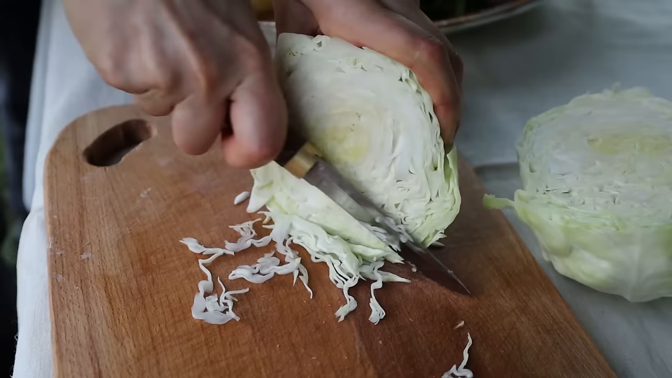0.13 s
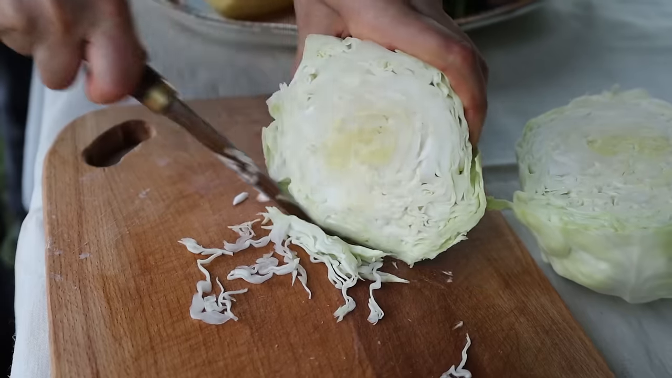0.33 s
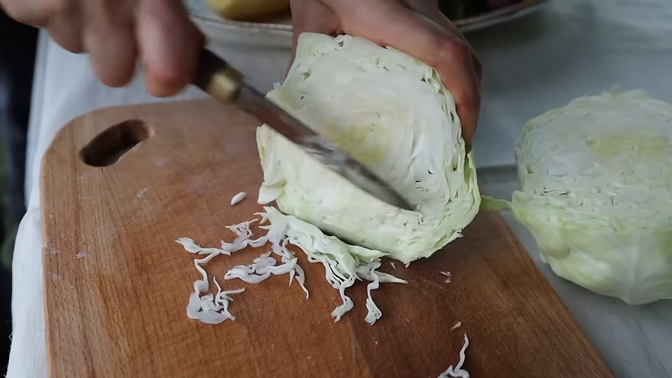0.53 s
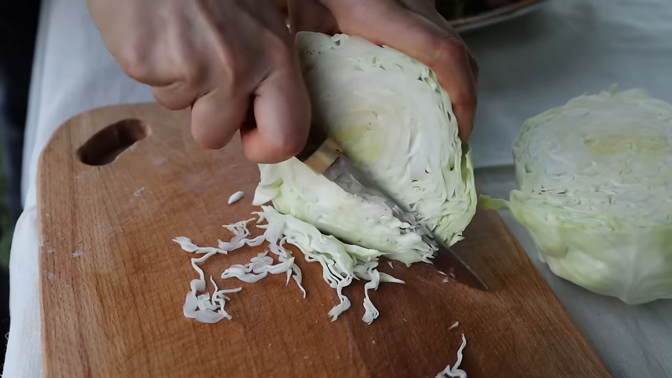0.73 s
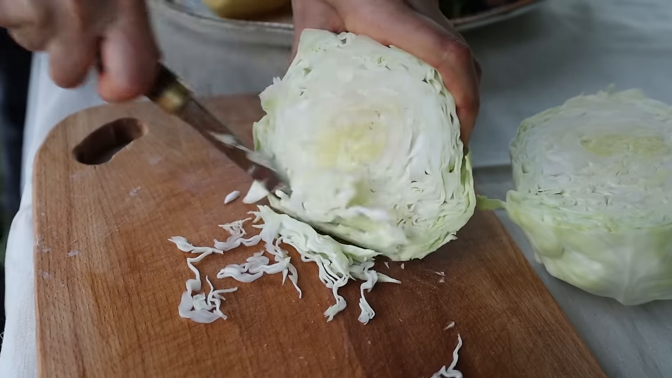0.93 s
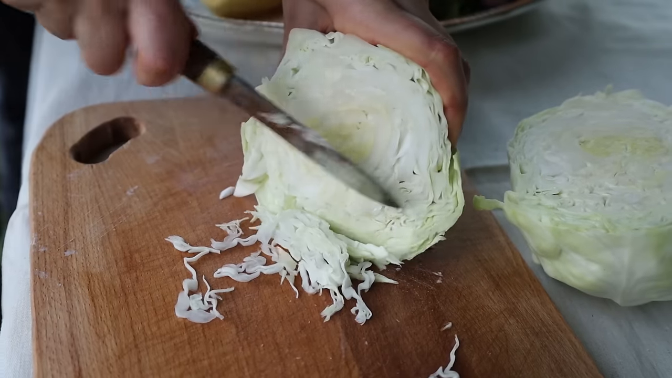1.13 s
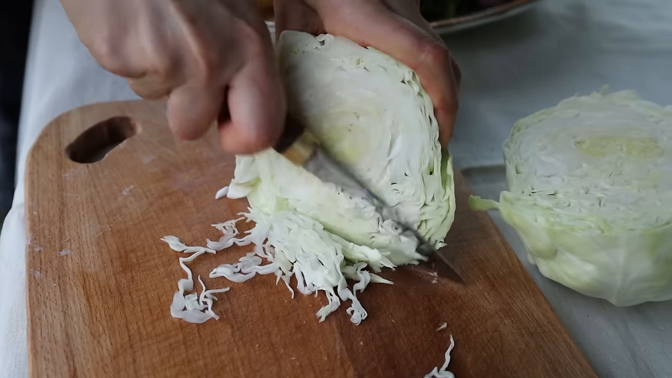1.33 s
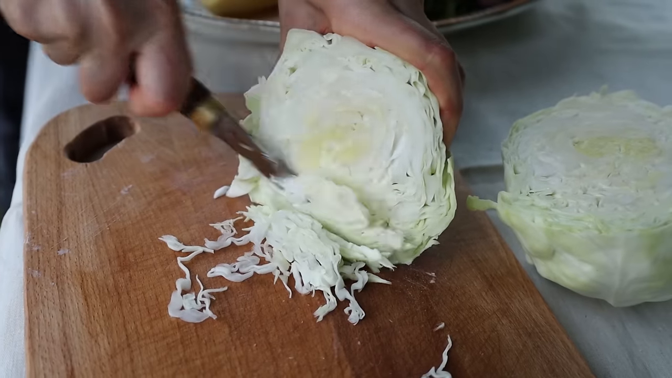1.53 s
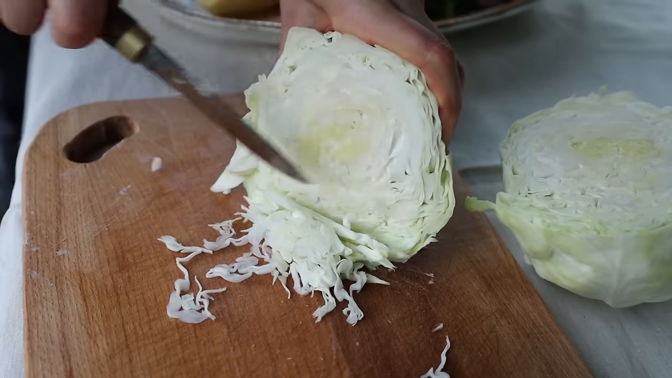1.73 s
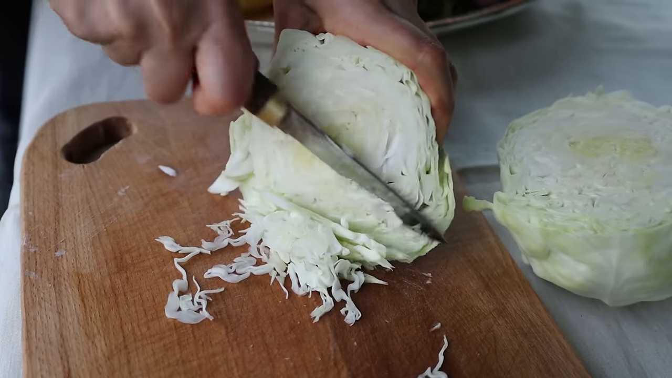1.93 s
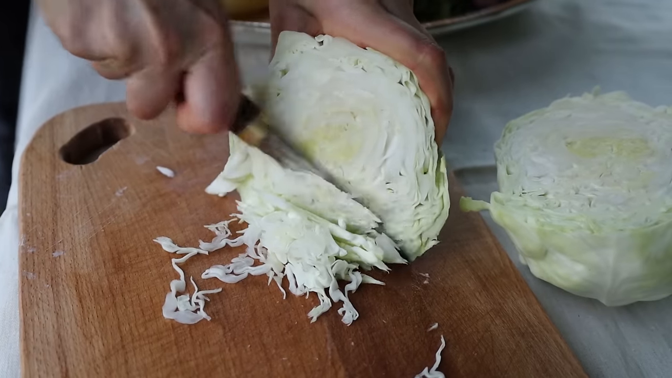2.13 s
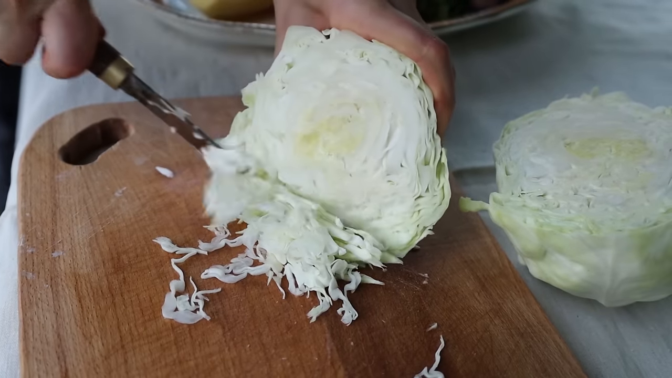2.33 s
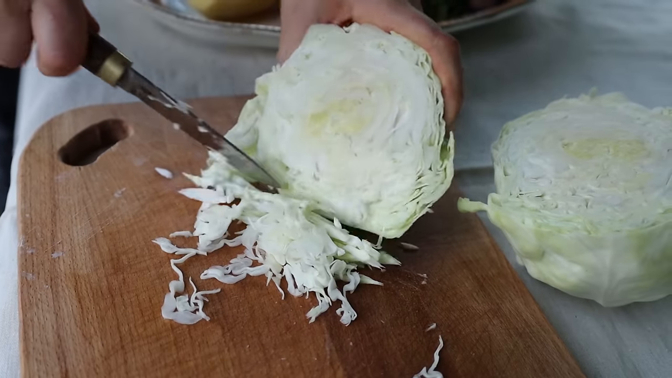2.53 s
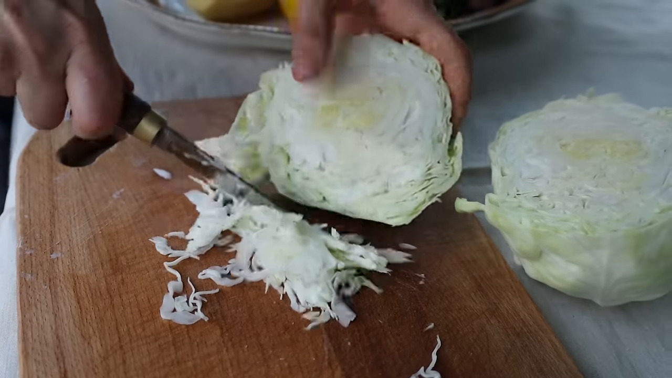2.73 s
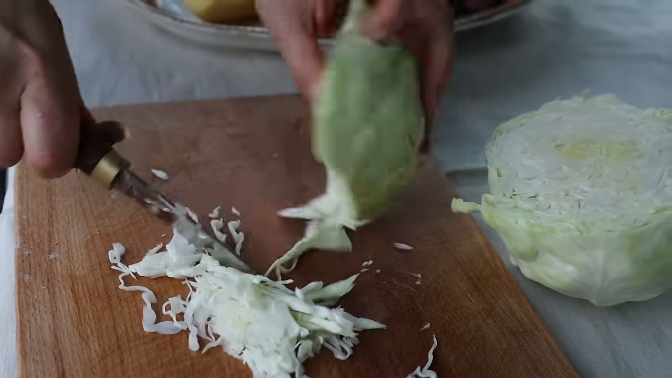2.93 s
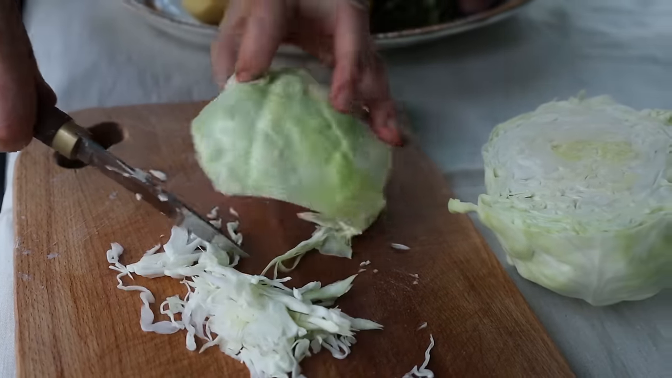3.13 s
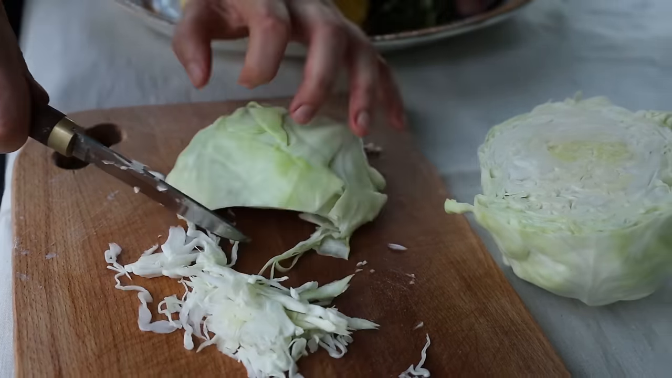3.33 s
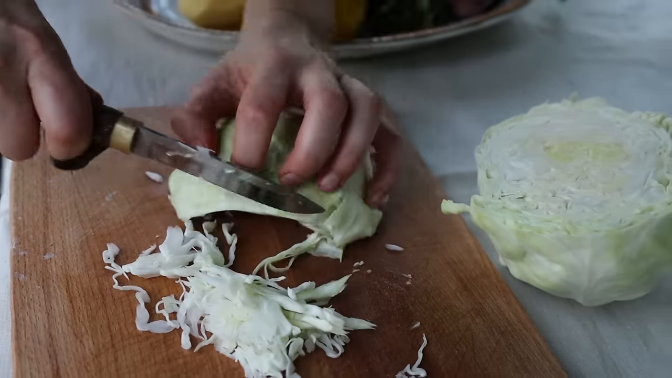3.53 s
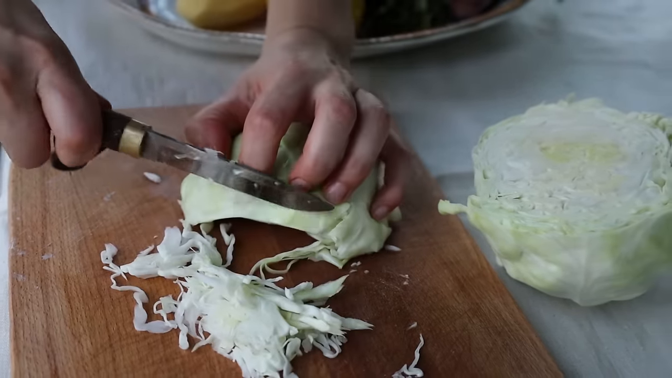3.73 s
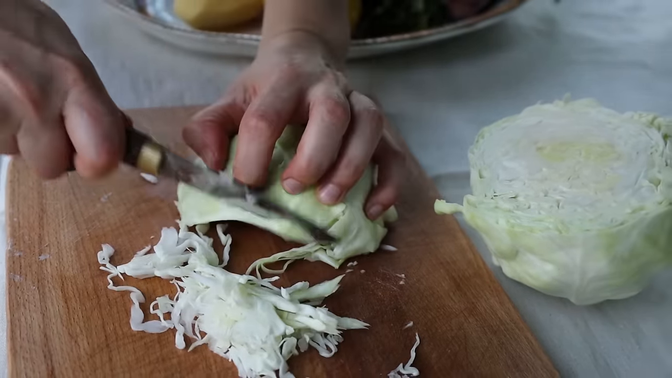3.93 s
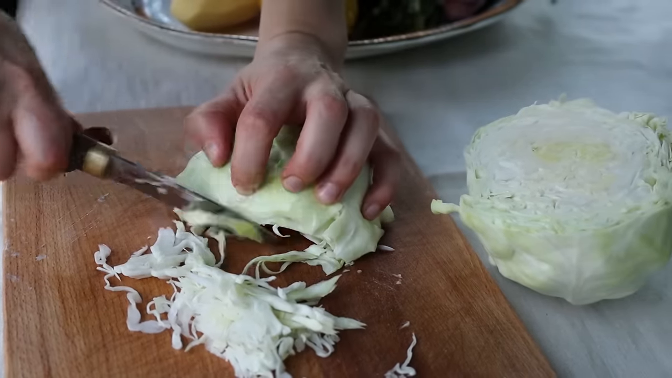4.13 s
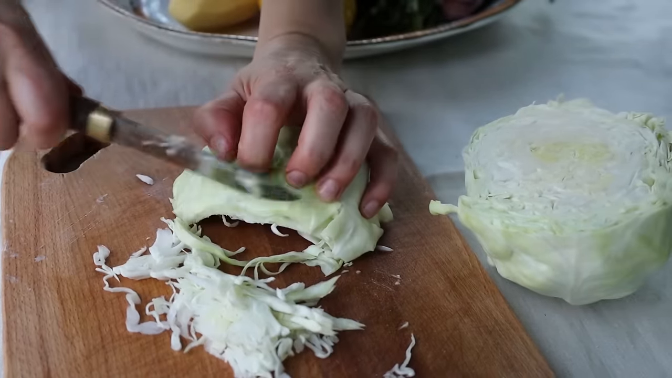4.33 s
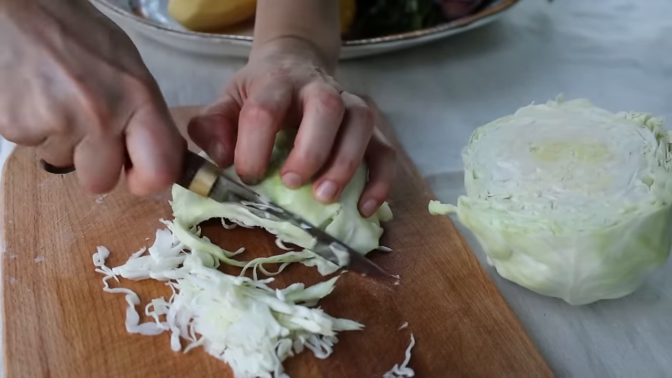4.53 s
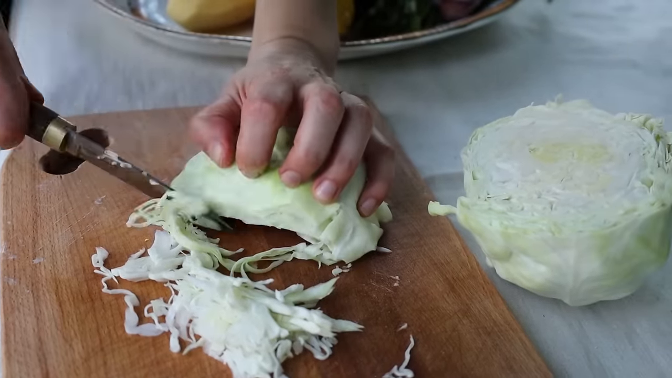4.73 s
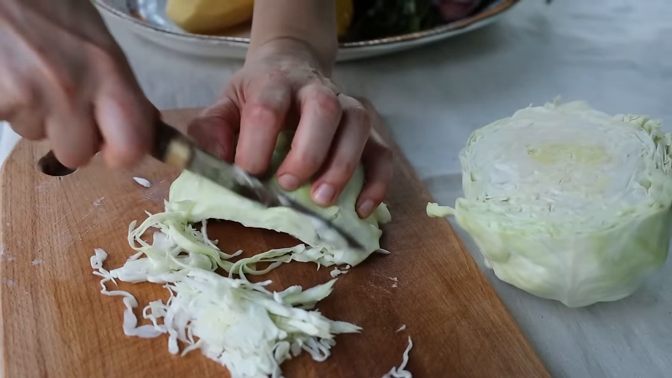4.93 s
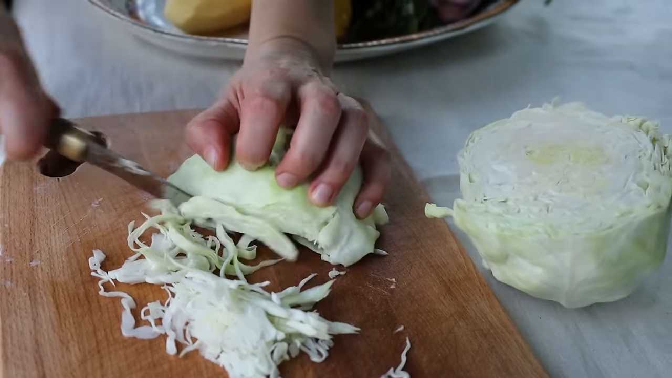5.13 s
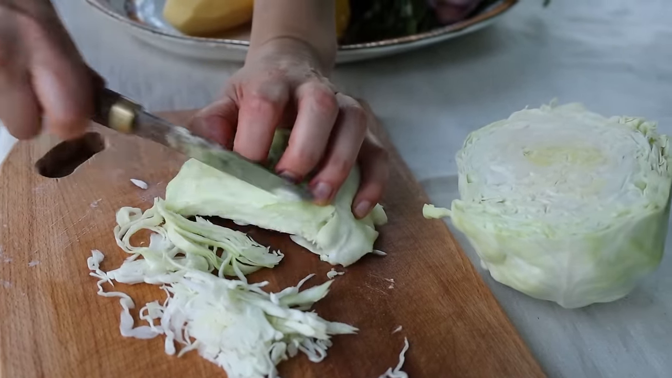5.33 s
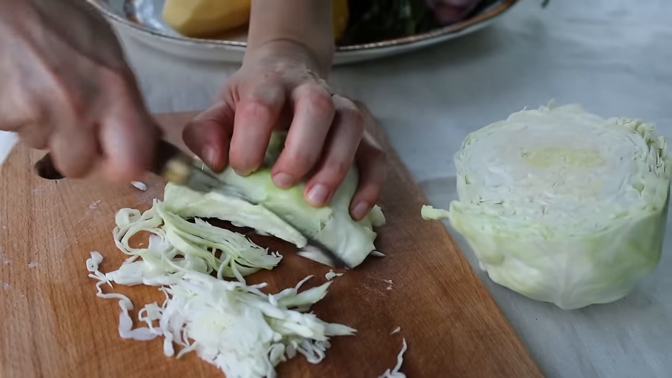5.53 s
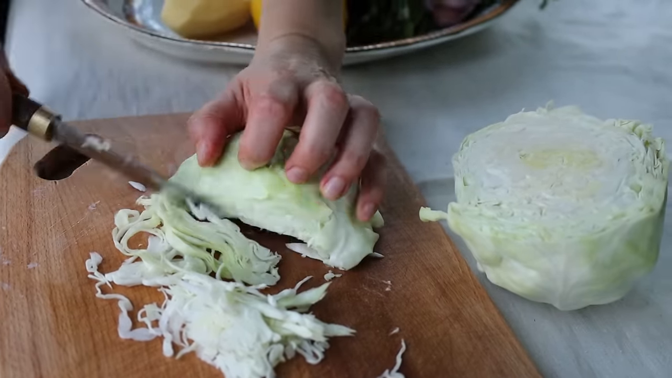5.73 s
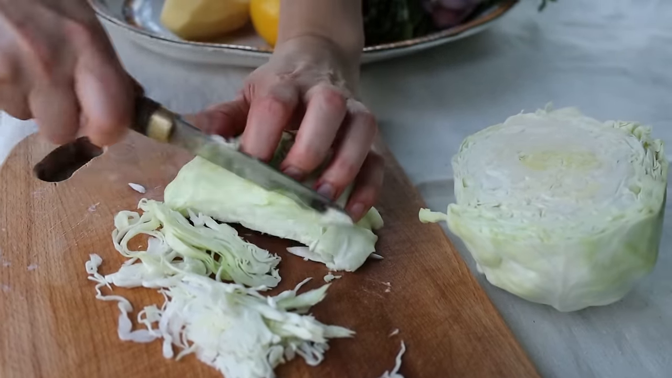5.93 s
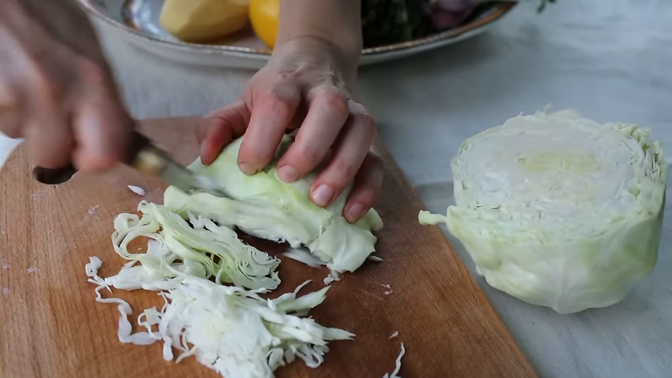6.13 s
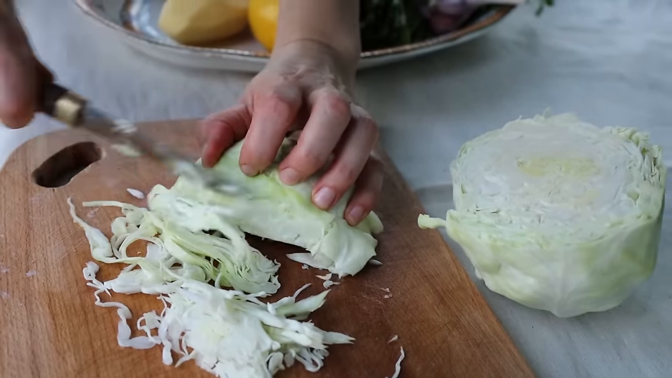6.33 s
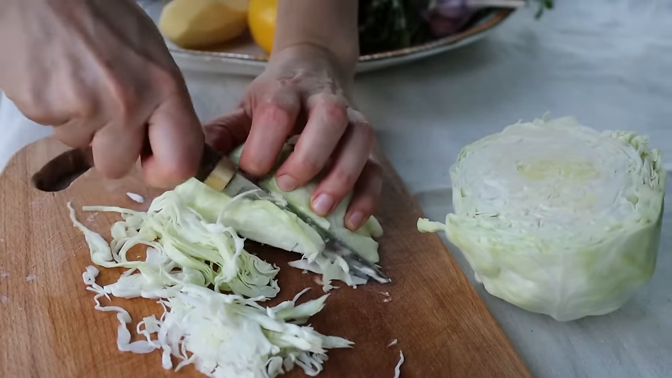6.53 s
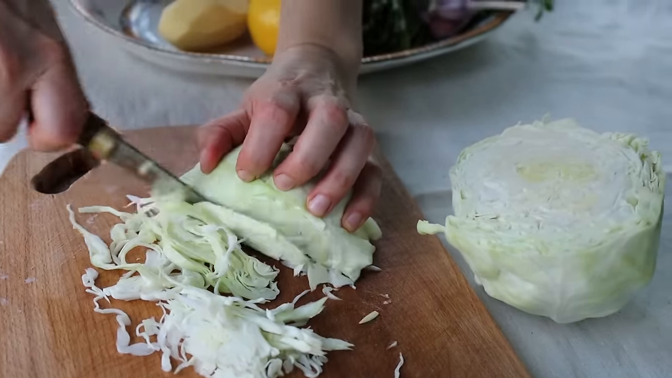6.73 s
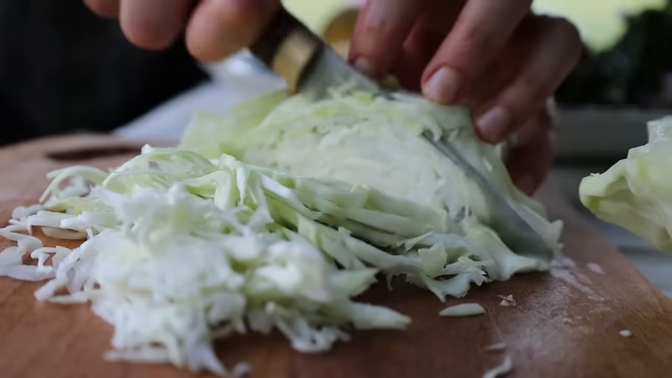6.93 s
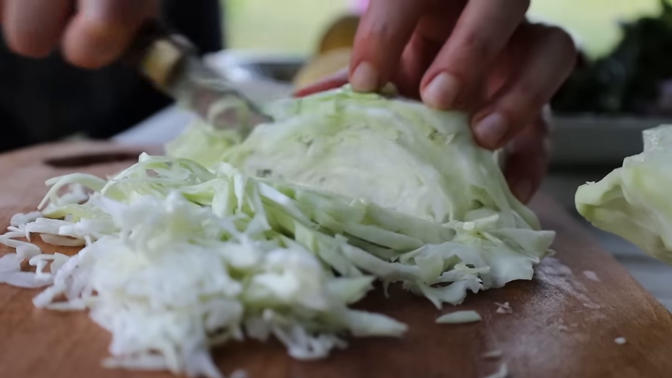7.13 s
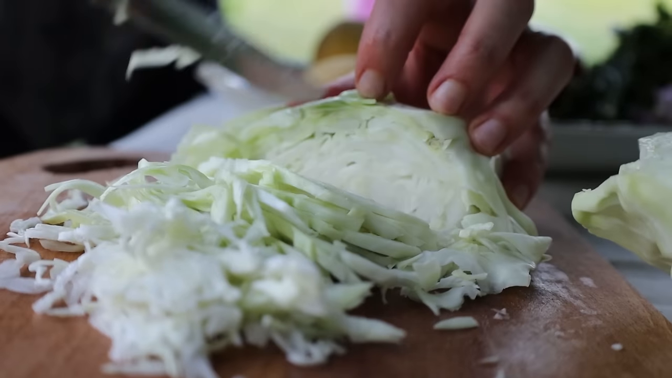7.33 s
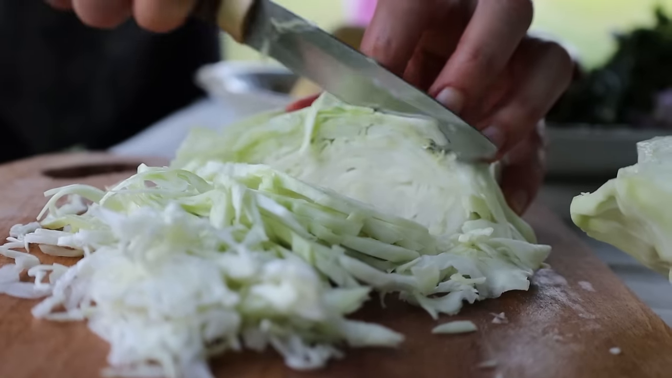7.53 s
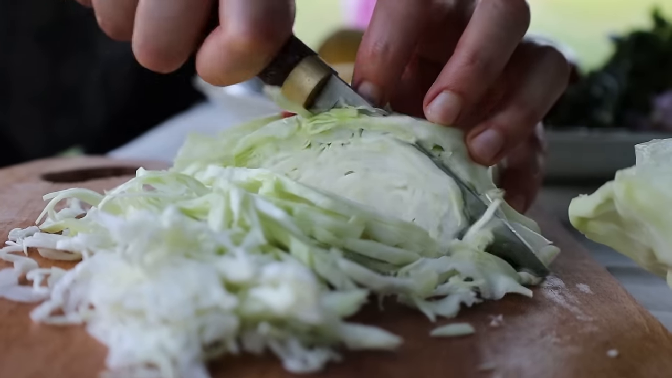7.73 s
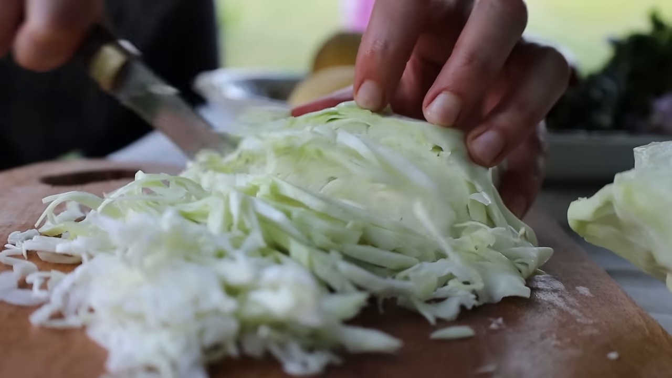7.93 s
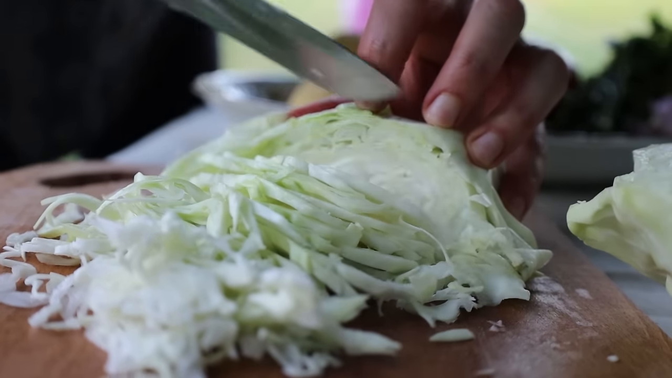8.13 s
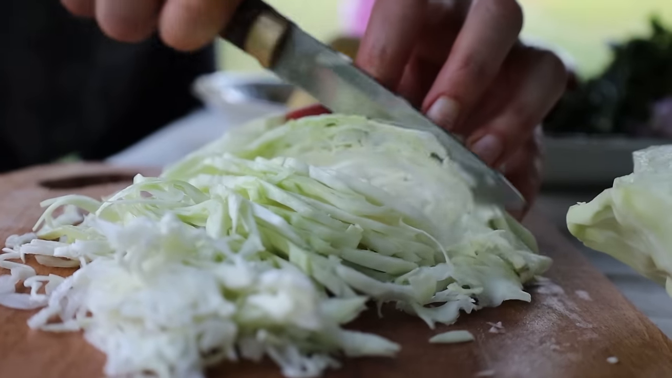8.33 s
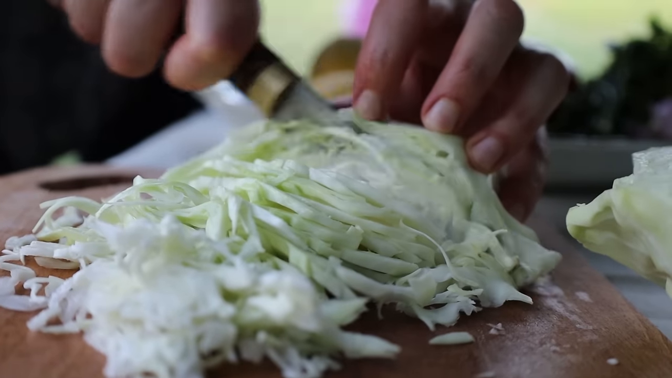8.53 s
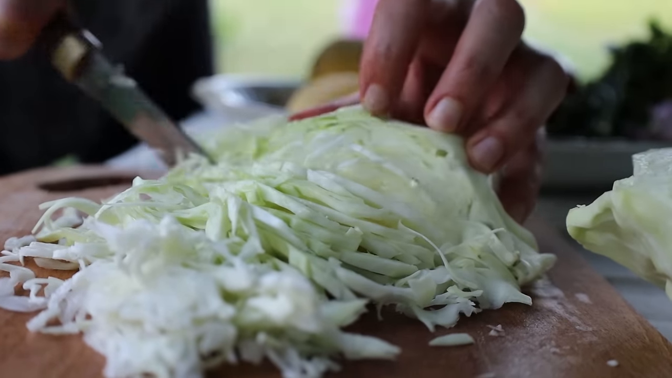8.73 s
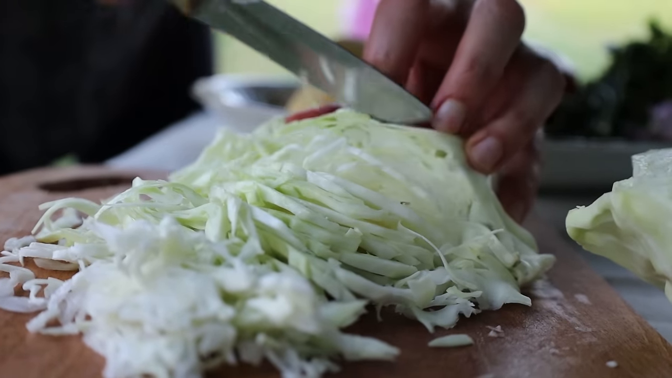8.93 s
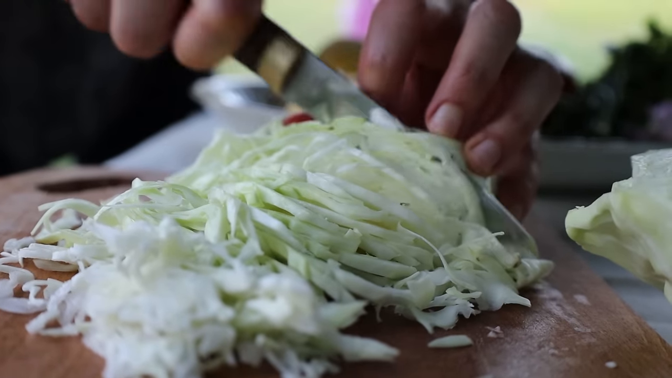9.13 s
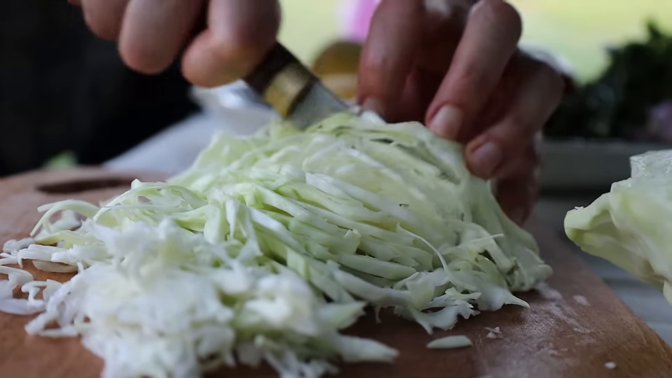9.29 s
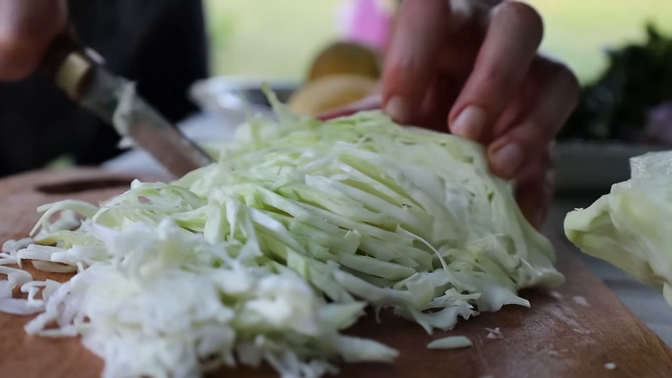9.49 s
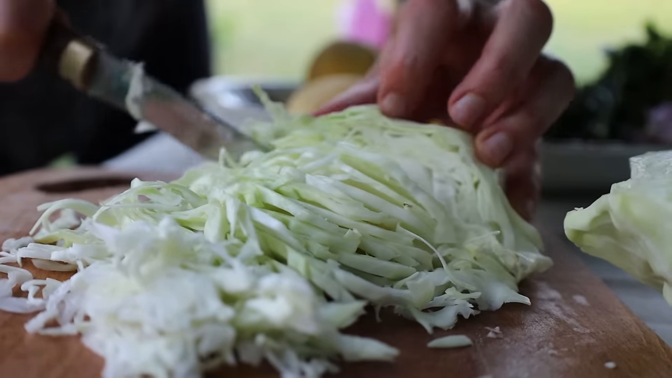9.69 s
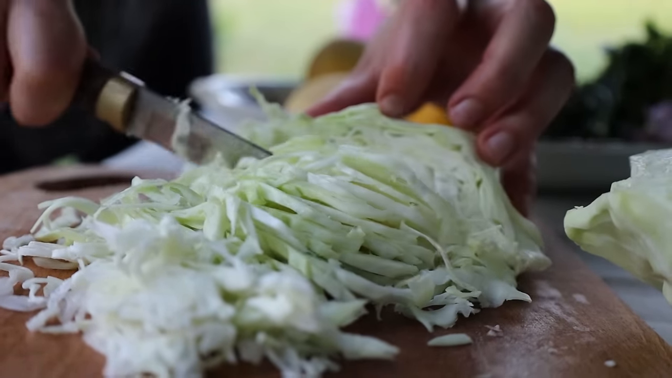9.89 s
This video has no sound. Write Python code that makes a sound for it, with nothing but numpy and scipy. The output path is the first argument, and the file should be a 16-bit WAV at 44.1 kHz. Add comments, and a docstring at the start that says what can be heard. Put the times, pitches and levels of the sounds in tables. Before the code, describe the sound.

Close to a wooden board on an outdoor table, a knife slices crisp cabbage. Four strokes crunch down, knock and scrape back; a pause brings soft leaf rustles and a dull double thump as the cabbage is set down. Six brisker cuts follow with loud, dry knocks, then four longer, juicier crunches with low creaky pushes and rasping returns. Soft low booms and a faint breeze lie beneath.

```python
"""A knife slices cabbage on a wooden board on an outdoor table, heard from close by.
Random slips and bursting cells drive wood, blade and leaf filters: each stroke crunches down, then scrapes back.
Blows and short ticks ring board modes; pushes and blows boom the table top, which also throws one quick echo.
A tone squeaks once; short deep notes and shaped noise make soft booms and a light breeze with faint hiss."""
import sys
import numpy as np
from scipy import signal
from scipy.io import wavfile
from scipy.ndimage import uniform_filter1d

SR = 44100
rng = np.random.default_rng(int(sys.argv[2]) if len(sys.argv) > 2 else 0)


def wav_out(sig):
    """Save sig, one row per channel (or a flat mono array), as 16-bit PCM at SR to the path in sys.argv[1]."""
    wavfile.write(sys.argv[1], SR, np.round(np.clip(np.atleast_2d(sig).T, -1, 1) * 32767).astype(np.int16))


N = 439236

# board modes, before damping and detuning: f/Hz, level/dB, t60/s
BOARD_MODES = [(436.3, -6, 0.043), (557.5, -15, 0.04), (663, 3, 0.013), (981, -6, 0.039), (1435, 0.5, 0.01),
               (1657, -3, 0.039), (1820, -12.5, 0.016), (2234, -13.5, 0.027), (2300, -31, 0.0089),
               (3150, -11, 0.015), (4180, -16.5, .02), (4600, -11, 0.029), (5800, -13, 0.011),
               (320, -11, 0.015)]
# table top boom modes, before damping: f/Hz, level/dB, t60/s
TABLE_MODES = [(144.7, 0.5, 0.068), (92, -9, 0.15), (191, -7, 0.064)]
# colour of tearing leaf cells: f/Hz, relative density/(dB per Hz)
CRUNCH_COLOUR = [(600, -10), (1500, -11), (2500, -4.5), (3800, -2), (5000, -5), (6600, -9), (7800, -3.5),
                 (9500, -7), (12000, -12.5), (15500, -20)]


def gain_of(db):
    """Decibels to an amplitude factor."""
    return 10 ** (np.asarray(db) / 20)


def evened(x):
    """Scales to rms 1."""
    return x / np.sqrt(np.mean(x ** 2) + 1e-20)


def highpassed(x, order, hz):
    """Butterworth high-pass."""
    return signal.lfilter(*signal.butter(order, hz, "high", fs=SR), x)


def filtered(x, response):
    """Convolves with an impulse response, cut to the scene length."""
    return signal.oaconvolve(x, response)[:N]


def spectrum_db(points, hz):
    """Reads a spectrum table on a log frequency axis."""
    f, value = np.transpose(points)
    return np.interp(np.log(hz + 1), np.log(f + 1), value)


def add(mix, s, sound):
    """Mixes a sound in at s seconds."""
    part = mix[round(s * SR):][:len(sound)]
    part += sound[:len(part)]


def ring(modes, count=4096):
    """Sum of exponentially dying modes, as after a blow: all start at their crest."""
    t = np.arange(count) / SR
    return sum(gain_of(db - 60 * t / t60) * np.cos(2 * np.pi * hz * t) for hz, db, t60 in modes)


def swell(modes, count=2048):
    """Modes that build up before dying, as under a drawn-out push."""
    t = np.arange(count) / SR
    return sum(gain_of(db - 60 * t / t60) * t / t60 * np.cos(2 * np.pi * hz * t) for hz, db, t60 in modes)


def causal(points, count=1024):
    """Minimum-phase click whose spectrum follows the table."""
    hz = abs(np.fft.fftfreq(count, 1 / SR))
    log_gain = np.log(gain_of(spectrum_db(points, hz)))
    click = np.fft.ifft(np.exp(np.conj(signal.hilbert(log_gain)))).real
    return click[:count // 2]


def clicks(per_s, spread_db):
    """Random clicks of either sign, a few much larger than the rest."""
    hit, size, sign = rng.random((3, N))
    height = gain_of(-spread_db * np.log(size + 0.024))
    return (hit < per_s / SR) * height * np.sign(sign - 0.5)


def judder(window_s, depth_db):
    """Uneven grip of the blade: a random gain smoothed over window_s, depth_db rms."""
    return gain_of(depth_db * evened(uniform_filter1d(rng.standard_normal(N), round(window_s * SR))))


def with_echo(x, share):
    """Direct sound plus its bounce off the table top, which travels further and carries little bass."""
    extra_path_s = 0.00155
    gap = np.zeros(round(extra_path_s * SR))
    bounce = highpassed(x, 1, 500)
    return np.concatenate([x, gap]) + share * np.concatenate([gap, bounce])


def drifting(x, depth_db):
    """The colour wanders as the blade moves through other layers: random gain patches over time and frequency."""
    hz, t, z = signal.stft(x, nperseg=256)
    patches = rng.standard_normal((len(t), len(hz))).T
    patches = evened(uniform_filter1d(uniform_filter1d(patches, 5, 0), 24, 1))
    return signal.istft(z * gain_of(depth_db * patches), nperseg=256)[1][:N]


def strokes():
    """Slips ring the board and the blade, bursting cells crackle, and the lurching push shakes the table."""
    # blade driven down through the leaves; levels are drives ahead of the filters: start/s, end/s,
    # end crunch/dB, crunch climb/dB, end scrape/dB, scrape climb/dB, rasp above scrape/dB,
    # start push/dB, end push/dB
    cuts = [(0.199, 0.231, -49.5, 5, -59, 4, 6, -65, -70), (0.696, 0.82, -48.5, 13, -54, 11, 2, -73, -61),
            (1.307, 1.464, -47, 15, -57.5, 9, 3.5, -83, -52),
            (1.955, 2.122, -46.5, 16, -58.5, 13, 6, -76, -62),
            (3.987, 4.08, -45.5, 22, -40.5, 24, -1, -49, -65),
            (4.513, 4.616, -50, 16.5, -56.5, 15.5, 5.5, -59, -63),
            (4.989, 5.086, -49.5, 14, -56, 7, 5, -49, -61),
            (5.467, 5.569, -48.5, 11.5, -55.5, 4, 1.5, -59, -68),
            (6.028, 6.144, -48, 18.5, -56, 11.5, 1, -59, -57),
            (6.535, 6.653, -47.5, 7.5, -55, 4, 0.5, -60, -63),
            (6.906, 7.076, -45, 10.5, -45.5, 9, -3, -50, -51.5),
            (7.554, 7.791, -46, 15, -50, 8, 0.5, -44.5, -57),
            (8.309, 8.542, -46, 13.5, -51, 7, 3.5, -57.5, -48),
            (9.059, 9.323, -46.5, 15, -47, 9.5, 2.5, -57.5, -47.5)]
    # blade drawn back along the wood, drives again: start/s, crest/s, end/s, crest scrape/dB,
    # mid-draw rasp above scrape/dB, crest crunch/dB, catch below crest/dB, sag by the end/dB, start jolt/dB
    draws = [(0.297, 0.36, 0.49, -51.5, 4, -54.5, 14.5, 6, -70),
             (0.909, 1.004, 1.101, -49, 6.5, -43.5, 8, 13, -62),
             (1.538, 1.616, 1.75, -50.5, 8, -44, 9, 10, -58),
             (2.201, 2.264, 2.487, -52.5, 7.5, -42.5, 9, 10.5, -55.5),
             (4.158, 4.266, 4.31, -55.5, 3, -67, 9, 15, -81),
             (4.68, 4.787, 4.875, -57.5, 7, -59.5, 3, 19, -84),
             (5.151, 5.215, 5.3, -59.5, 7.5, -57, 2, 8, -61.5),
             (5.641, 5.677, 5.93, -57.5, 7.5, -55, -0.5, 40.5, -69),
             (6.199, 6.216, 6.36, -53.5, 6, -52.5, 11, 13.5, -60),
             (6.705, 6.71, 6.905, -54, 6, -52.5, -4.5, 8, -72),
             (7.139, 7.214, 7.357, -46, 4.5, -42.5, 4, 12.5, -55),
             (7.85, 7.936, 8.11, -47.5, 4, -43, 8, 11.5, -46),
             (8.605, 8.657, 8.88, -45.5, 4.5, -43, 10, 16.5, -47.5),
             (9.376, 9.442, 9.6, -49.5, 8, -44.5, 6.5, 13, -49.5)]
    # leaves handled or brushed aside, drives again: start/s, length/s, top crunch/dB, top scrape/dB
    rustles = [(1.151, 0.012, -43.5, -53.5), (1.801, 0.0083, -58, -64), (1.888, 0.014, -70, -67),
               (2.505, 0.16, -63.5, -82), (2.681, 0.059, -71, -75.5), (2.743, 0.04, -64.5, -72),
               (2.901, .13, -65, -78), (3.1, 0.043, -64.5, -73), (3.27, 0.2, -67.5, -86),
               (3.576, 0.28, -76, -77), (3.81, 0.031, -78, -74), (8.276, 0.039, -73, -69.5),
               (8.897, 0.035, -62.5, -84), (9.634, 0.23, -66.5, -73.5), (9.841, 0.044, -80.5, -91)]
    # broad bands the blade sings in when dragged over wood: f/Hz, level/dB, t60/s
    blade_modes = [(1503, 4.5, 0.0036), (1761, -10.5, 0.014), (1907, -2.5, 0.0048), (2550, -6.5, 0.0063),
                   (3200, -2, 0.0025), (4446, -9, 0.0051)]
    moves = [cut(*row) for row in cuts] + [draw(*row) for row in draws] + [rustle(*row) for row in rustles]
    scrape, rasp, crunch, push = (drive(moves, column) for column in (1, 2, 3, 4))

    grip = judder(0.0072, 0.81)
    slips = evened(clicks(5000, 2.2) * grip)
    damped_board = [(hz, db, t60 * 0.73) for hz, db, t60 in BOARD_MODES[:3]]  # by blade and hand
    wood = filtered(slips * scrape, swell(damped_board)) * gain_of(4.5)
    blade = filtered(slips * rasp, swell(blade_modes)) * gain_of(6)

    cells = evened(clicks(6000, 3.0) * grip * judder(0.0069, 1.3))
    # now and then a thick fibre tears in a burst of about 1 ms
    fibres = uniform_filter1d(abs(clicks(45, 2.5)), 40) * 40 * rng.standard_normal(N)
    tearing = (cells + gain_of(3.5) * fibres) * crunch
    leaf = filtered(tearing, causal(CRUNCH_COLOUR)) * gain_of(7.5)

    push = push * judder(0.059, 4.5)
    lurch = uniform_filter1d(evened(clicks(300, 0.67)) * push, 60)  # a soft push has little treble
    damped_table = [(hz, db, t60 * 0.49) for hz, db, t60 in TABLE_MODES]
    table = filtered(lurch, swell(damped_table, count=8192)) * gain_of(1.5)

    near = highpassed(with_echo(wood + blade + leaf, 0.049)[:N], 2, 340)
    return drifting(near, 2.55) + table


def cut(start, end, crunch_db, climb_db, wood_db, wood_climb_db, rasp_db, push_db, last_push_db):
    """Rows (t/s, scrape, rasp, crunch, push/dB): resistance builds until the blade is through."""
    climb_power, push_arch_db = 1.3, 3.5  # climbs fast, then levels off; weight arches up mid-cut
    u = np.linspace(0, 1, num=12)
    left = (1 - u) ** climb_power
    wood = wood_db - wood_climb_db * left
    crunch = crunch_db - climb_db * left
    push = push_db + u * (last_push_db - push_db) + push_arch_db * np.sin(np.pi * u)
    return np.transpose([start + u * (end - start), wood, wood + rasp_db, crunch, push])


def draw(start, crest, end, wood_db, rasp_db, crunch_db, catch_db, sag_db, jolt_db):
    """Rows (t/s, scrape, rasp, crunch, push/dB): the blade catches, crests, sags and lifts off the wood."""
    catch_s, lift_s, lift_db = 0.027, 0.013, 23.5
    sag_power = 1.83  # holds, then sags faster
    crunch_swing = 1.35  # crunch catches and sags this much deeper than the scrape
    rasp_rise_db, jolt_fade_db_per_s = 5.5, 88  # rasp grows towards the blade tip
    s = np.linspace(start, end, num=24)
    under = catch_db * np.clip((crest - s) / (crest - start), 0, 1) ** 2
    under = under + sag_db * np.clip((s - crest) / (end - crest), 0, 1) ** sag_power
    wood = wood_db - under
    along = (s - start) / (end - start)
    rasp = wood + rasp_db + rasp_rise_db * (along - 0.5)
    push = jolt_db - jolt_fade_db_per_s * (s - start)
    rows = np.transpose([s, wood, rasp, crunch_db - crunch_swing * under, push])
    quieter = np.array([0, 1, 1, 1, 1]) * lift_db
    first, last = rows[0] - quieter, rows[-1] - quieter
    first[0], last[0] = start - catch_s, end + lift_s
    return np.vstack([first, rows, last])


def rustle(start, length, crunch_db, wood_db):
    """Rows (t/s, scrape, rasp, crunch, push/dB): quick rise, then fade, no weight on the table."""
    rise_share, fade_db, rasp_db = 0.22, 18, 6
    s = start + length * np.array([0, rise_share, 1])
    under = fade_db * np.array([0.5, 0, 1])
    wood = wood_db - under
    return np.transpose([s, wood, wood + rasp_db, crunch_db - under, np.full(len(s), -150)])


def drive(moves, column, settle_s=0.033, settle_db=-17):
    """Gain over time from the rows of all moves; a move stops within some ms, then loose shreds settle."""
    gain = np.zeros(N)
    for rows in map(np.transpose, moves):
        t = np.arange(rows[0, 0], rows[0, -1], 1 / SR)
        add(gain, rows[0, 0], gain_of(np.interp(t, rows[0], rows[column])))
    stop, settle = np.exp(-1 / (0.0049 * SR)), np.exp(-1 / (settle_s * SR))
    held = np.maximum(gain, np.roll(gain, 300))
    move = signal.lfilter([1 - stop], [1, -stop], held)
    shreds = signal.lfilter([1 - settle], [1, -settle], gain)
    return move + gain_of(settle_db) * shreds


def knock(db, boom_db, contact_ms, echo, lasts):
    """A short blow rings the board a little differently each time, rattles out and booms the table."""
    detune, offset_db = (rng.standard_normal((len(BOARD_MODES), 2)) * (0.025, 2.5)).T
    modes = [(hz * (1 + a), top + b, t60 * lasts)
             for (hz, top, t60), a, b in zip(BOARD_MODES, detune, offset_db)]
    wood = ring(modes)
    t = np.arange(len(wood)) / SR
    envelope = gain_of(-60 * t / 0.073) * np.minimum(t / 0.0016, 1)
    rebounds, shreds = envelope * rng.standard_normal((2, len(t)))
    # small rebounds ring the board again, and loose shreds hiss
    rerung = signal.oaconvolve(rebounds, wood)[:len(t)]
    wood = wood + gain_of(-38.5) * rerung + gain_of(-8.5) * shreds
    blow = np.exp(-(np.arange(-20, 21) / SR * 1000 / contact_ms) ** 2)
    wood = np.convolve(wood, blow)
    edge_tick = causal(CRUNCH_COLOUR)  # of the steel edge
    wood[20:532] += gain_of(5.0) * edge_tick / edge_tick.max()
    wood = highpassed(with_echo(wood, echo), 1, 250)  # a small board radiates little bass
    sound = np.convolve(ring(TABLE_MODES, count=8192), np.hanning(60) / 30) * gain_of(boom_db)
    sound[:len(wood)] += gain_of(db) * wood / abs(wood).max()
    return sound


def tap_and_tick(db, tick_db):
    """A brief noise burst: a tap on the damped board and a tick in the leaf colour."""
    t = np.arange(700) / SR
    burst = rng.standard_normal(len(t)) * gain_of(-60 * t / 0.019)
    damped_board = [(hz, mode_db, t60 * 0.69) for hz, mode_db, t60 in BOARD_MODES[:9]]
    tap = np.convolve(burst, ring(damped_board, count=512))
    tick = np.convolve(burst, causal(CRUNCH_COLOUR))
    return gain_of(db - 0.5) * (tap / abs(tap).max() + gain_of(tick_db) * tick / abs(tick).max())


def squeak(start, end, hz, db):
    """A leaf squeaks on the wood: a thin tone with a randomly wandering phase."""
    t = np.arange(round((end - start) * SR)) / SR
    wobble = np.cumsum(rng.standard_normal(len(t))) * 0.044
    return gain_of(db) * np.sin(2 * np.pi * hz * t + wobble) * signal.windows.tukey(len(t), 0.4)


def boom(db, length_s):
    """A deep note, of slightly random pitch, that swells and fades."""
    t = np.arange(round(length_s * SR)) / SR
    hz = 81.8 * rng.uniform(0.79, 1.05)
    return gain_of(db) * np.hanning(len(t)) * np.sin(2 * np.pi * (hz * t + rng.random()))


def air():
    """Breeze rumble and hiss: random short-time spectra, the bass swelling and dipping most."""
    # breeze and hiss colour: f/Hz, relative density/(dB per Hz)
    air_colour = [(12, -36), (25, -6.5), (55, -3), (82, 1), (105, -12.5), (200, -18), (500, -23),
                  (1200, -24), (2200, -32), (4400, -31), (6600, -36), (9600, -31), (12500, -34.5),
                  (13300, -62)]
    rms_db = -63
    frames, hz = N // 256 + 5, np.fft.rfftfreq(1024, 1 / SR)
    real, imag, patches = rng.standard_normal((frames, 513, 3)).T
    patches = evened(uniform_filter1d(uniform_filter1d(patches, 12, 0), 14, 1))
    gusts = evened(uniform_filter1d(rng.standard_normal(frames), 30))
    bass_share = 1 / (1 + (hz[:, None] / 250) ** 2)
    field_db = spectrum_db(air_colour, hz)[:, None] + 0.4 * patches + 2.5 * gusts * bass_share
    noise = signal.istft((real + 1j * imag) * gain_of(field_db), nperseg=1024, noverlap=768)[1][:N]
    return gain_of(rms_db) * evened(noise)


def scene():
    """Strokes, knocks, taps with ticks, booms and a squeak over the open air."""
    # blows on the board by the blade or, near 3.35 s, the cabbage set down:
    # t/s, board peak/dB, table boom/dB, contact/ms, echo share, ring length factor
    knocks = [(0.2269, -5.5, -31.5, 0.1, 0.38, 0.93), (.8246, -10.5, -33.5, 0.097, 0.58, 0.88),
              (1.4704, -20.5, -37, 0.22, 0.43, 0.82), (2.1296, -21.5, -40.5, 0.18, 0.56, 0.78),
              (3.3454, -21, -29.5, 0.19, 0.039, 0.5), (3.3525, -21.5, -29.5, 0.094, 0.066, 0.54),
              (4.0857, -7.5, -33.5, 0.12, 0.57, 1), (4.62, -9.5, -36, 0.094, 0.32, 0.79),
              (5.0887, -2.5, -30.5, 0.088, 0.35, 0.72), (5.5713, -2.5, -30, 0.072, 0.47, 0.76),
              (6.147, -6.5, -32.5, 0.11, 0.6, 0.67), (6.7057, -13, -37.5, 0.11, 0.7, 0.61)]
    # short cracks, leaf ticks and dull blade jerks: t/s, tap level/dB (0.5 dB over its peak), tick above tap/dB
    ticks = [(0.336, -44, 12.5), (0.863, -56, 6), (1.162, -45.5, 0), (1.299, -53, 5), (1.815, -48, 3),
             (1.905, -72, -9), (1.951, -51.5, 8.5), (2.58, -46, 0), (2.884, -51, -7), (2.934, -55, 6),
             (2.951, -57, 0), (2.998, -60, 7), (3.077, -65, -9), (3.189, -67.5, 14), (3.265, -58, -5),
             (3.628, -62, -2), (3.637, -50.5, -11), (3.697, -50, -21), (3.995, -42, -17), (5.809, -62, -14),
             (6.556, -39, -16.5), (6.839, -37.5, -30), (6.953, -25.5, -34), (6.966, -34, -28),
             (7.077, -24, -30), (7.148, -27, -31), (7.562, -49.5, -14), (7.598, -36, -5), (7.67, -31, -20),
             (7.736, -35, -2), (7.89, -24.5, -22), (8.063, -34.5, -2), (8.324, -40, -37), (8.42, -39, 8),
             (8.537, -52, -1), (8.624, -21.5, -32), (9.219, -21.5, -43.5), (9.317, -36, -27),
             (9.38, -28, -22), (9.754, -55.5, 5), (9.774, -58, 7), (9.809, -57, -9), (9.849, -58, 7.5)]
    # soft low booms: middle t/s, level/dB
    booms = [(0.529, -53), (1.118, -50), (1.619, -58), (2.609, -56), (3.619, -57.5), (4.35, -61),
             (4.9, -62), (6.304, -52.5), (6.849, -57.5)]
    # faint squeak of a leaf on the wood, one row: start/s, end/s, f/Hz, level/dB
    squeak_row = (3.735, 3.8, 3106, -74)
    boom_s = 0.24
    mix = strokes() + air()
    for s, *row in knocks:
        add(mix, s - 20 / SR, knock(*row))  # the time marks the middle of the blow
    for s, *row in ticks:
        add(mix, s, tap_and_tick(*row))
    for s, db in booms:
        add(mix, s - boom_s / 2, boom(db, boom_s))
    add(mix, squeak_row[0], squeak(*squeak_row))
    return mix[None]


def record(dry):
    """Band limit: a steep linear-phase low-pass."""
    edge_hz = 15750
    lowpass = signal.firwin(1023, edge_hz, window=("kaiser", 10), fs=SR)
    return signal.oaconvolve(dry, lowpass[None], "same")


dry = scene()
out = record(dry)
wav_out(out)
```